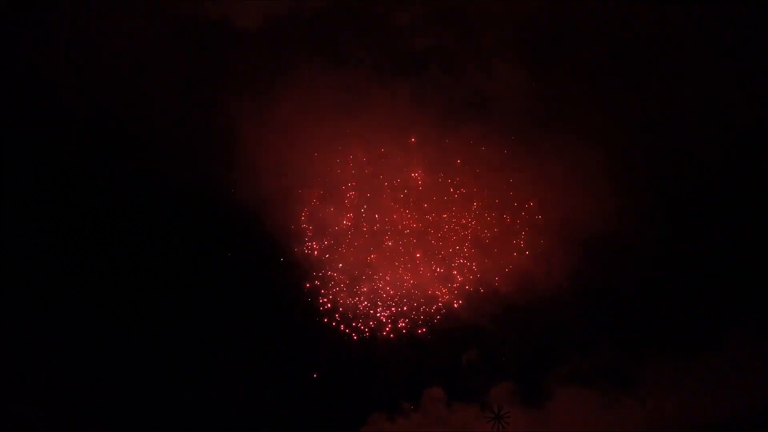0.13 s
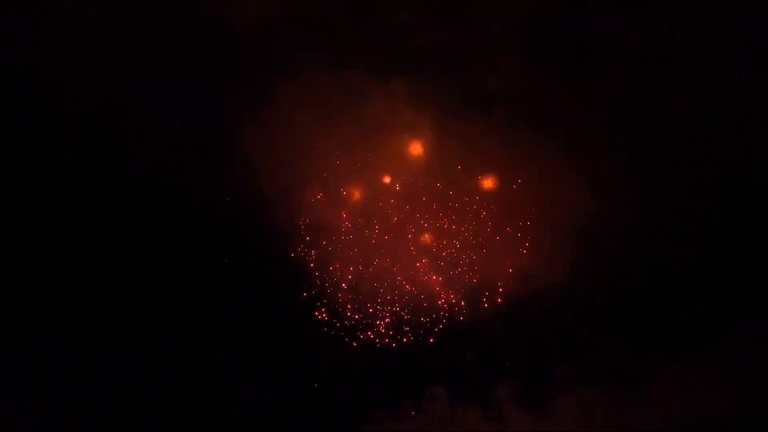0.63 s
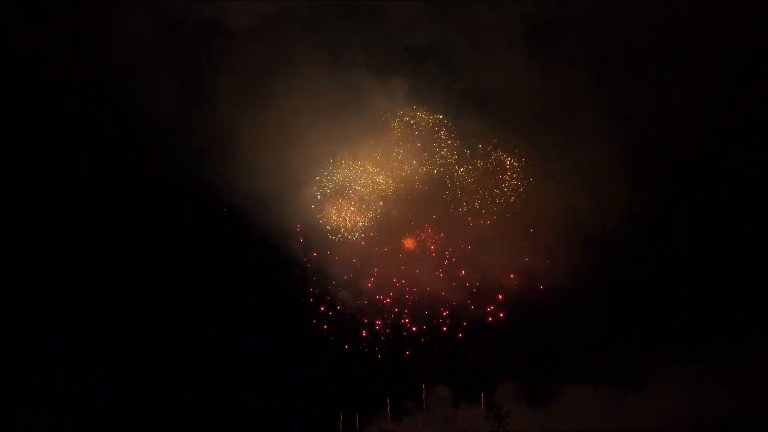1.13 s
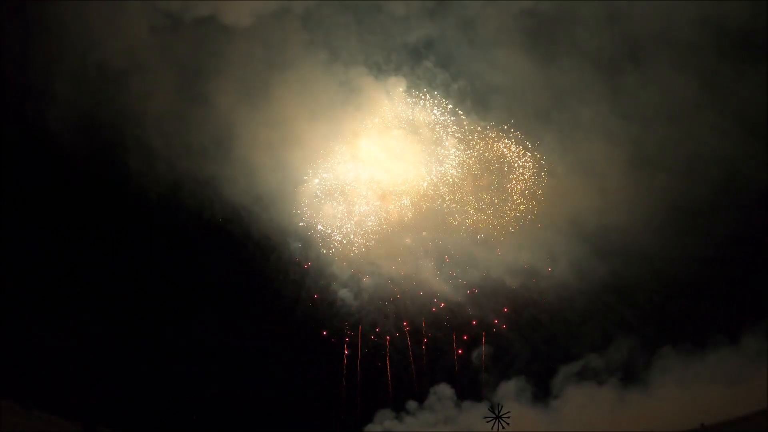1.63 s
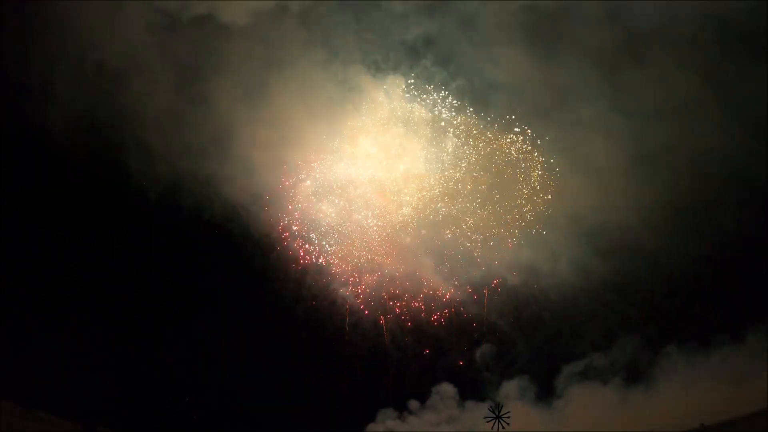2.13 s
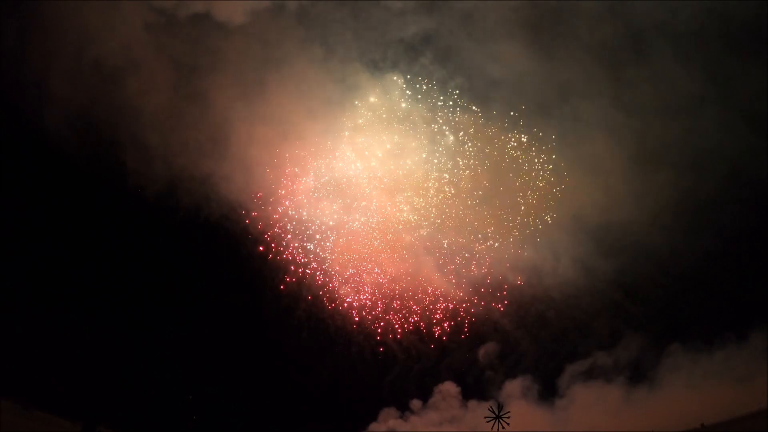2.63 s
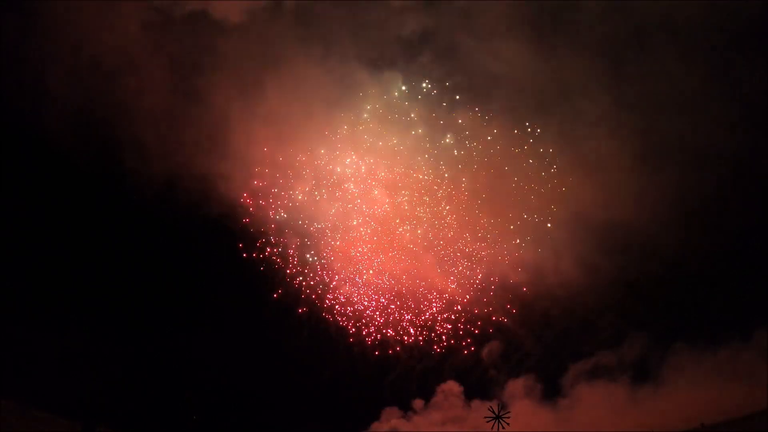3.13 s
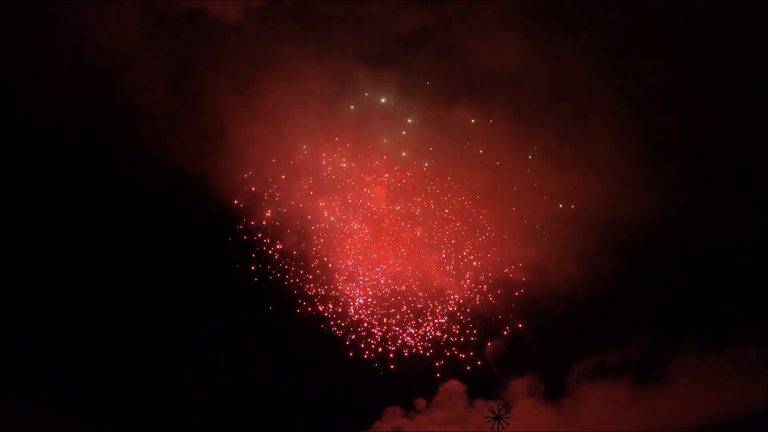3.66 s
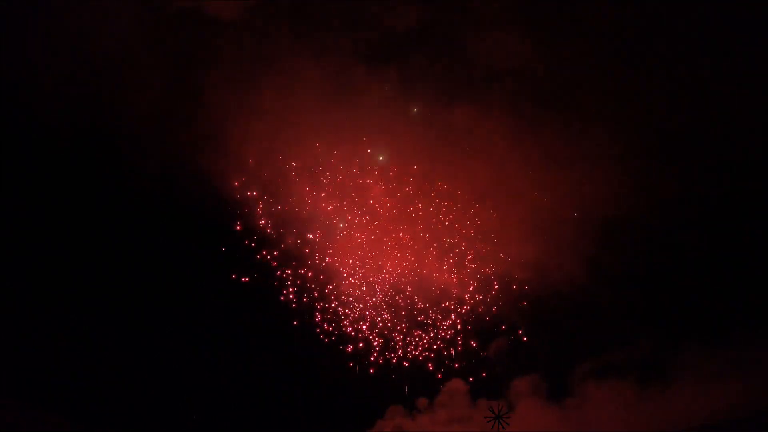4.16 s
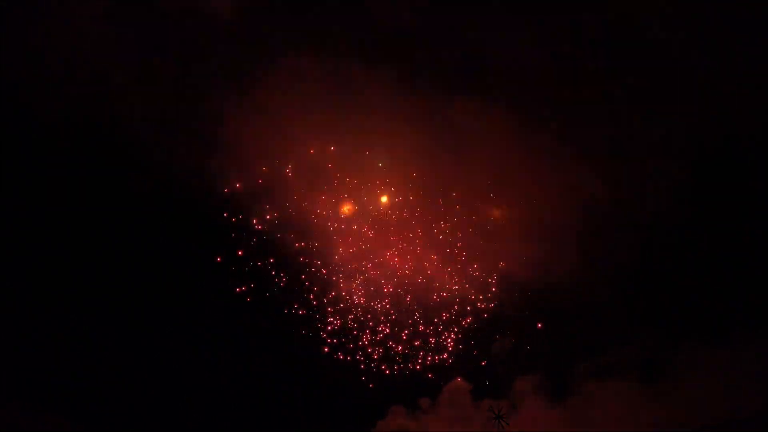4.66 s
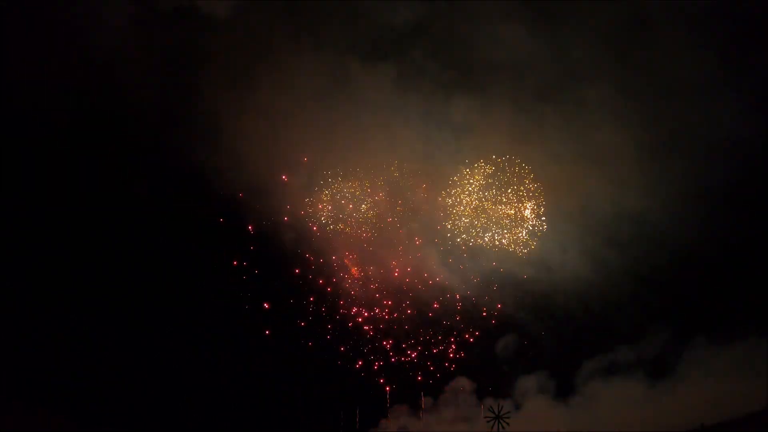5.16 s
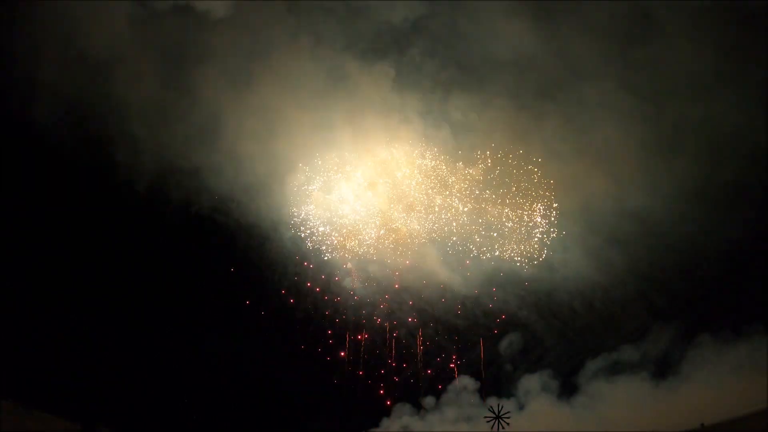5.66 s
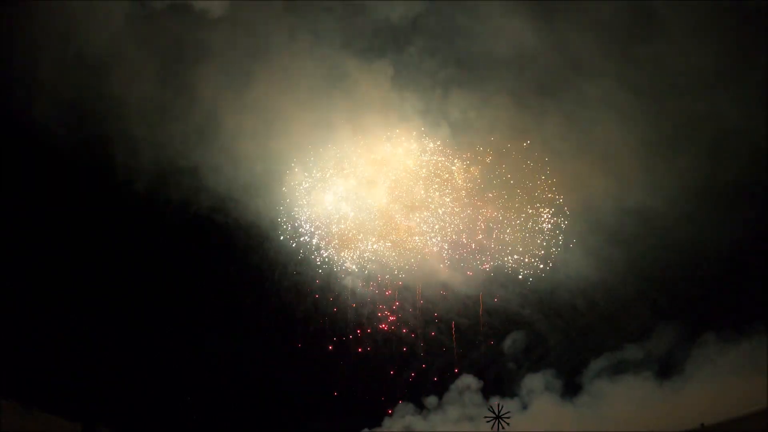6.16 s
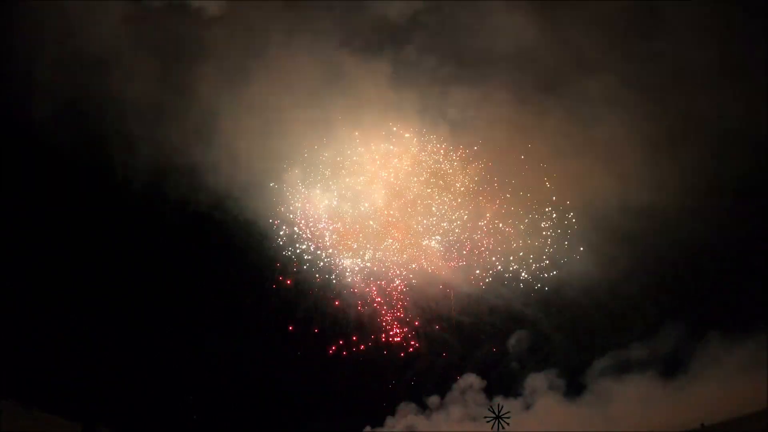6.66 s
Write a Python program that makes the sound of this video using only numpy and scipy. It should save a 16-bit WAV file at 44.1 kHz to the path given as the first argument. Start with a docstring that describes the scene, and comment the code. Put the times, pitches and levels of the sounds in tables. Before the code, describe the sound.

A low, soft night hush opens, with the faint roll of earlier fireworks dying in the hills. At 1.1 s shells burst overhead: a sharp, very loud bang, several more within a fifth of a second, each doubled by its ground reflection. From 1.3 to 1.55 s mortars fire in a crackling cluster with hard, hollow cracks and short thumps, mixed with further bursts; a last bang lands at 1.63 s. Wall echoes slap back around 1.7-2.1 s, then a low bumpy rumble sinks slowly into the hush until 4.2 s. Mortars crack again at 4.25-4.45 s, with small distant pops; a lone burst hits at 4.9 s. The densest volley comes at 5.25-5.6 s, bangs and cracks almost overlapping. Echoes return near 5.7-6.1 s and the rumble rolls away to the end. Peaks are flattened and gritty from overload; stereo is wide in the tails, with slight hiss.

```python
"""A low night hush comes first, with the roll of earlier fireworks still dying away in the hills.
Then shells burst high in the air in quick clusters, while mortars on the ground fire with a crack and a thump.
Bursts are pressure shocks, heard directly and off the ground; cracks are noise ringing in the mortar tube.
A far wall returns some cracks, and shaped noise makes the tails that roll away over the landscape.
The blasts overload the preamp, which flattens their peaks."""
import sys
import numpy as np
from scipy import signal
from scipy.fft import rfft, irfft, next_fast_len
from scipy.io import wavfile
from scipy.ndimage import uniform_filter1d

SR = 44100
rng = np.random.default_rng(int(sys.argv[2]) if len(sys.argv) > 2 else 0)


def store_pcm(level_fs):
    """Save levels as 16-bit WAV."""
    pcm = np.round(np.clip(level_fs, -1, 1) * 32767).astype(np.int16)
    wavfile.write(sys.argv[1], SR, np.atleast_2d(pcm).T)


def boost(x):
    """Linear amplitude factor 10**(x/20) for a level x in decibels (scalar or array-like)."""
    u = np.asarray(x, float) / 20
    return 10 ** u


N = 299447  # length in samples

# Night air: pitch_hz, level_db (per Hz, relative)
HUSH_COLOUR = [(15, -55), (25, -23), (82, -5.5), (175, -5), (206, -2.5), (236, -7), (293, -5), (354, -11.5),
               (439, -3), (1290, -21.5), (16000, -44)]
# Preamp hiss: pitch_hz, level_db (per Hz, relative)
HISS_COLOUR = [(500, -18.5), (4000, -1), (9000, 1), (13000, -3), (16000, -12.5)]
HUSH_DB, HISS_DB = -67, -85  # overall levels
# How alike left and right are in noise: pitch_hz, likeness (1 = same, 0 = unrelated, below 0 = opposed)
LIKENESS = [(60, 0.95), (180, 0.87), (550, 0.72), (1650, 0.77), (4970, 0.47), (15000, -0.5)]
# Left-right balance of noise, before each sound's own lean scales it: pitch_hz, left_over_right_db
BALANCE = [(60, -1), (240, 1.5), (950, 2), (3770, 1), (15000, 1.5)]

# Each scattered tail has a colour: pitch_hz, level_db (per Hz, relative)
# and a course: level_db (before blast strengths and lumps), build_up_s, t60_s (time to fall by 60 dB)
# Deepest boom, returning late
DEEP_COLOUR = [(15, -15.5), (30, 1.5), (60, -1.5), (90, -21), (200, -62)]
DEEP_COURSE = (-71.5, 0.12, 1.0)
# Low roll
RUMBLE_COLOUR = [(20, -20), (45, -4), (90, 1.5), (160, -1), (260, -21.5), (500, -58)]
RUMBLE_COURSE = (-58, 0.042, 0.98)
# Hills, the longest tail
HILLS_COLOUR = [(18, -31.5), (30, -4.5), (112, 0.5), (215, -8), (336, -6.5), (461, -12.5), (584, 0),
                (1040, -4), (5900, -28), (16000, -48.5)]
HILLS_COURSE = (-75, 0.28, 8.7)
# Open field
FIELD_COLOUR = [(18, -40), (30, -11), (112, 5.5), (336, -15.5), (426, -19), (1010, -13.5), (1590, -21.5),
                (2830, -26.5), (8080, -40.5), (16000, -76.5)]
FIELD_COURSE = (-51.5, .05, 1.92)
# Close surroundings of the shells
NEAR_BURST_COLOUR = [(24, -40), (40, -13.5), (91, -5.5), (283, -4), (770, -17), (1950, -25), (3740, -35),
                     (6490, -38.5), (16000, -52)]
NEAR_BURST_COURSE = (-34.5, 0.00054, 0.26)
# Close surroundings of the mortars
NEAR_LAUNCH_COLOUR = [(24, -30), (40, -3), (167, -1.5), (297, -37), (433, -32.5), (491, -29), (1300, -20),
                      (1480, -26), (3300, -32.5), (16000, -70.5)]
NEAR_LAUNCH_COURSE = (-14, 0.0036, 0.25)
DEEP_LATE_S = 0.28  # the deepest boom comes back from far off
EARLIER_DB = 10.5  # energy of shells that burst before, still rolling in the hills
SLAPS_PER_S, SLAP_S = 16, 0.0072  # chance echoes: average rate, and time constant of their fading

# Loudest single echoes and smeared far thuds: start_s, level_db, pitch_hz (centre)
ECHOES = [(1.981, -30, 470), (2.025, -35.5, 1800), (2.096, -31.5, 820), (2.168, -32.5, 296.7),
          (4.82, -32, 720), (4.955, -35, 246), (5.135, -31.5, 297.6), (5.233, -31.5, 910),
          (5.429, -14.5, 1210), (6.05, -30.5, 910), (6.161, -37, 900)]
# Small sharp pops, far off: start_s, level_db, pitch_hz (centre)
POPS = [(1.445, -23, 2003), (4.258, -22.5, 1190), (4.706, -37.5, 910), (4.8565, -26, 740),
        (4.89, -31, 1010)]
# How echoes are smeared: rise_s, t60_s
ECHO_SMEAR = (0.011, 0.07)
# How pops are smeared: rise_s, t60_s
POP_SMEAR = (.003, .022)

# Mortars firing on the ground: start_s, crack_db, thump_db, sees_wall (true = the far wall answers)
LAUNCHES = [(1.3018, -9, -13.5, True), (1.4078, -10.5, -12, True), (1.4654, -4.5, -9.5, True),
            (1.481, -1.5, -12.5, False), (1.5083, -2.5, -5, True), (1.527, -8, -10.5, False),
            (4.249, -24, -32, False), (4.2819, 0.5, -7, False), (4.3398, 0.5, -4.5, False),
            (4.416, -6.5, -21.5, False), (4.4208, -6, -5, False), (4.7385, -22.5, -37.5, False),
            (5.2985, -9, -11.5, True), (5.3301, -10, -13.5, False), (5.467, -2, -5.5, True),
            (5.474, -4.5, -6, True), (5.4935, -2.5, -8, True), (5.585, -5.5, -19, False)]
# Resonances of the mortar crack: pitch_hz, width_hz, level_db
TUBE = [(1066, 420, 1.5), (717, 330, -8.5), (1800, 1700, -9), (3100, 1300, -10), (4960, 3300, -17.5),
        (7800, 4400, -27)]
WALL_S, WALL_DB = 0.4005, -20.5  # round trip to the far wall, and the level change on the way
# A quieter crack is further off and loses treble
FAR_HZ, FAR_DB_PER_OCTAVE = 14000, 17  # cutoff at 0 dB; each 17 dB down halves the cutoff

# Shells bursting aloft: start_s, level_db, bounce_delay_ms (extra time by way of the ground)
BURSTS = [(1.1109, 13.5, 6.44), (1.1769, 20, 5.86), (1.1859, 14.5, 6.6), (1.2054, 12.5, 7.2),
          (1.2789, 15.5, 6.2), (1.4697, 13.5, 6.3), (1.4774, 14, 5.9), (1.631, 14.5, 5.64),
          (4.9106, 13.5, 5.97), (5.246, 14.5, 6.22), (5.2487, 15, 6.8), (5.344, 14.5, 5.35),
          (5.3449, 17, 6.3), (5.432, 17.5, 7.2), (5.4383, 5.5, 6.5), (5.5028, 16.5, 6.8)]
# Spread of the lag between the two microphones: direct_s, off_ground_s
MICROPHONE_LAGS = (.000022, .0001)


def evened(x):
    """Scales to rms 1."""
    return x / np.sqrt(np.mean(x ** 2) + 1e-20)


def read(points, hz):
    """Reads a table between its points, on a log-frequency axis."""
    f, value = np.transpose(points)
    return np.interp(np.log(hz + 1), np.log(f + 1), value)


def add(mix, s, sound):
    """Mixes a sound in at time s."""
    part = mix[..., round(s * SR):][..., :sound.shape[-1]]
    part += sound[..., :part.shape[-1]]


def low_cut(x, hz, q):
    """Removes the bass with a resonant second-order high-pass."""
    w = 2 * np.pi * hz
    return signal.lfilter(*signal.bilinear([1, 0, 0], [1, w / q, w * w], SR), x)


def resonate(x, hz, width):
    """Rings at one pitch, with gain 1 at the peak."""
    return signal.lfilter(*signal.iirpeak(hz, hz / width, SR), x)


def noise(colour, lean=1):
    """Steady stereo noise, partly alike in both ears; lean scales the left-right balance."""
    size = next_fast_len(N)
    hz = np.fft.rfftfreq(size, 1 / SR)
    a, b = rfft(rng.standard_normal((2, size)))
    same = np.clip(read(LIKENESS, hz), -1, 1)
    tilt = boost(lean * read(BALANCE, hz) / 2)
    left = a * tilt
    right = (same * a + np.sqrt(1 - same ** 2) * b) / tilt
    coloured = np.array([left, right]) * boost(read(colour, hz))
    return evened(irfft(coloured, size)[:, :N])


def hush():
    """Night air: steady, mostly low noise."""
    return boost(HUSH_DB) * noise(HUSH_COLOUR)


def scatter(blasts, colour, course, lumpy_db, lean, earlier_db=-99, slap_db=0):
    """Every blast adds energy that builds up and dies away; single echoes make it lumpy."""
    level_db, build_s, t60 = course
    energy = np.zeros(N)
    for s, db in blasts:
        energy[round(s * SR)] += boost(2 * db)  # doubled dB: energy, not amplitude
    rise = np.exp(-1 / (build_s * SR))
    fall = boost(-120 / (t60 * SR))
    built = signal.lfilter([1 - rise], [1, -rise], energy)
    built[0] += boost(2 * earlier_db)
    rolling = signal.lfilter([1], [1, -fall], built)

    wander = uniform_filter1d(rng.standard_normal(N), size=200)
    lumps = np.tanh(evened(uniform_filter1d(wander, size=200)))
    place, size = rng.random((2, N))
    chance_echoes = size * (place < SLAPS_PER_S / SR)
    slaps = signal.lfilter([1], [1, -np.exp(-1 / (SLAP_S * SR))], chance_echoes)
    shape = boost(level_db + lumpy_db * lumps + slap_db * slaps)
    return shape * np.sqrt(rolling) * noise(colour, lean)


def tails():
    """The landscape returns each blast as many overlapping echoes, heard as shaped noise."""
    shells = [(s, db) for s, db, _ in BURSTS]
    mortars = [(s, db) for s, _, db, _ in LAUNCHES]
    both = shells + [(s, db + 12.5) for s, db in mortars]
    late = [(s + DEEP_LATE_S, db) for s, db in both]
    low = shells + [(s, db + 26.5) for s, db in mortars]
    return (scatter(late, DEEP_COLOUR, DEEP_COURSE, lumpy_db=1.0, lean=.4)
            + scatter(low, RUMBLE_COLOUR, RUMBLE_COURSE, lumpy_db=2, lean=.4)
            + scatter(both, HILLS_COLOUR, HILLS_COURSE, lumpy_db=1.15, lean=2.3, earlier_db=EARLIER_DB)
            + scatter(both, FIELD_COLOUR, FIELD_COURSE, lumpy_db=0.5, lean=1.0, slap_db=6)
            + scatter(shells, NEAR_BURST_COLOUR, NEAR_BURST_COURSE, lumpy_db=5.5, lean=0)
            + scatter(mortars, NEAR_LAUNCH_COLOUR, NEAR_LAUNCH_COURSE, lumpy_db=4.0, lean=.3))


def rattle(envelope, pair, hz, width):
    """Irregular arrivals ring one broad resonance; the energy is that of one short knock."""
    same = np.clip(1.05 - hz / 12000, 0, 1)  # low pitches are more alike in both ears
    right = same * pair[0] + np.sqrt(1 - same ** 2) * pair[1]
    arrivals = np.array([pair[0], right]) * envelope
    arrivals[:, envelope.argmax()] += 2.3 * envelope.max()  # the straight path arrives as one sharp front
    ringing = resonate(resonate(arrivals, hz, width), hz, 2.4 * width)
    return evened(ringing) * np.sqrt(0.00082 * SR / len(envelope))


def puffs(rows, smear):
    """Far echoes, thuds and pops: short smeared puffs of noise around one pitch."""
    rise_s, t60 = smear
    t = np.arange(-.006, .04, 1 / SR)
    shape = boost(-60 * np.maximum(t, 0) / t60) * np.clip(1 + t / rise_s, 0, 1)
    sides = boost([[1.2], [-1.2]])  # a little louder on the left
    out = np.zeros((2, N))
    for (s, db, hz), pair in zip(rows, rng.standard_normal((len(rows), 2, len(t)))):
        add(out, s + t[0], boost(db) * rattle(shape, pair, hz, width=0.52 * hz) * sides)
    return out


def dulled(x, db):
    """Air takes the treble off a far, quiet crack."""
    cutoff_hz = min(FAR_HZ * 2 ** (db / FAR_DB_PER_OCTAVE), .45 * SR)
    return signal.lfilter(*signal.butter(2, cutoff_hz, fs=SR), x)


def crack(envelope, draws):
    """Irregular noise rings all the resonances of the mortar tube together."""
    return sum(boost(db) * rattle(envelope, pair, hz, width) for (hz, width, db), pair in zip(TUBE, draws))


def push_of_air(t):
    """A low swing of pressure leaves the mortar, with the tube's overtone on top."""
    u = np.maximum(t - .0005, 0)
    thump = -np.sin(2 * np.pi * 92 * u) * u * np.exp(-u / .004)
    overtone = np.sin(2 * np.pi * 330 * u) * np.exp(-u / 0.0057)
    return thump / thump.max() - .25 * overtone


def launches():
    """Scattered forerunners, the crack of the tube, then a low push of air; the wall returns both."""
    lead = .02  # seconds kept free ahead of the crack
    t = np.arange(-lead, .07, 1 / SR)
    forerunners = boost(-13.5 + 180 * t) * (t < 0) * np.clip((t + .012) / .002, 0, 1)
    blow = boost(-60 * np.maximum(t, 0) / 0.024) * np.clip((t + 0.0021) / 0.0026, 0, 1)
    wake = boost(-14 - 60 * t / 0.025) * (t > 0)
    envelope = forerunners + blow + wake
    thump = push_of_air(t)
    sides = boost([[.8], [-.8]])  # the wall is a little louder on the left
    out = np.zeros((2, N))
    chance = rng.standard_normal((len(LAUNCHES), 2, len(TUBE), 2, len(t)))
    for (s, crack_db, thump_db, sees_wall), draws in zip(LAUNCHES, chance):
        direct, returned = (crack(envelope, rows) for rows in draws)
        add(out, s - lead, boost(crack_db) * dulled(direct, crack_db) + boost(thump_db) * thump)
        echo = resonate(returned, hz=2600, width=1820) * sides + boost(-32) * thump
        add(out, s - lead + WALL_S, sees_wall * boost(crack_db + WALL_DB) * echo)
    return out


def shock(lag_s, rise_s):
    """A shock front with its suction phase; the microphone's low cut makes it swing under and over."""
    t = np.maximum(np.arange(1500) / SR - lag_s, 0)
    blast = np.clip(t / rise_s, 0, 1) * (1 - t / 0.0067) * np.exp(-t / 0.0048)
    return low_cut(low_cut(blast, hz=183.0, q=1.06), hz=54, q=.51)


def bursts():
    """Each shock arrives direct and off the ground, a little apart in the two microphones."""
    out = np.zeros((2, N))
    lags = np.array(MICROPHONE_LAGS) * rng.standard_normal((len(BURSTS), 2))
    lead = .0003  # seconds of room for the earlier microphone
    for (s, db, bounce_ms), lag in zip(BURSTS, lags):
        # the ground dulls the front, so the second arrival rises more slowly
        for delay_ms, rise_s, apart in zip((0, bounce_ms), (.0001, .00045), lag):
            arrivals_s = lead + apart * np.array([[-.5], [.5]])
            add(out, s + delay_ms / 1000 - lead, boost(db) * shock(arrivals_s, rise_s))
    return out


def scene():
    """The hush, the rolling tails, the far echoes and pops, the mortars and the bursting shells."""
    distant = puffs(ECHOES, ECHO_SMEAR) + puffs(POPS, POP_SMEAR)
    return hush() + tails() + distant + launches() + bursts()


def top_cut(x):
    """Nothing passes above the cut-off."""
    return signal.sosfilt(signal.butter(12, 17160, fs=SR, output="sos"), x)


def record(dry):
    """The preamp saturates; a coupling capacitor tilts the flat tops and a filter rounds their edges."""
    ceiling = 0.5
    clipped = ceiling * np.sign(dry) * np.sqrt(np.tanh((dry / ceiling) ** 2))
    coupled = signal.lfilter(*signal.butter(1, 33, "high", fs=SR), clipped)
    coupled = np.clip(coupled, -.49, .49)  # the converter's own hard limit
    present = coupled + 0.12 * resonate(coupled, hz=2490, width=2600)
    rounded = signal.lfilter(*signal.butter(1, 18000, fs=SR), present)
    hissing = rounded + boost(HISS_DB) * noise(HISS_COLOUR, lean=0)
    treble_edge = signal.firwin(255, 16750, window=("kaiser", 8), fs=SR)  # steep low-pass
    mix = signal.oaconvolve(hissing, treble_edge[None], "same")
    return top_cut(mix)


dry = scene()
out = record(dry)
store_pcm(out)
```